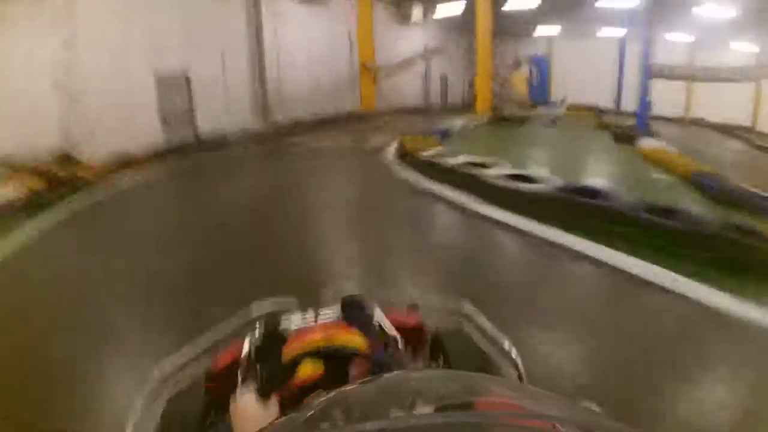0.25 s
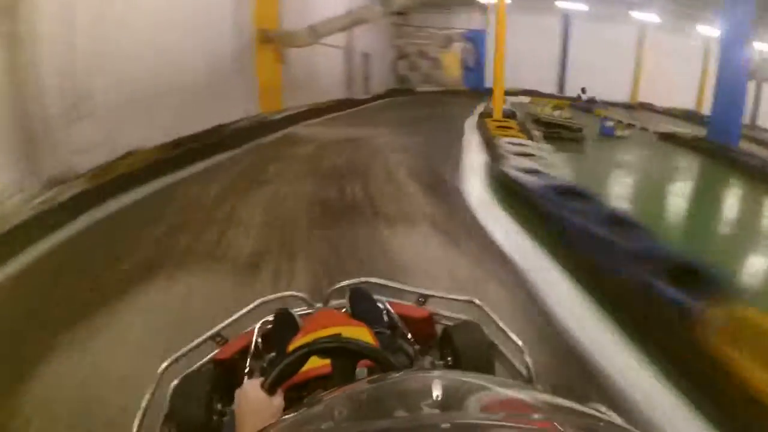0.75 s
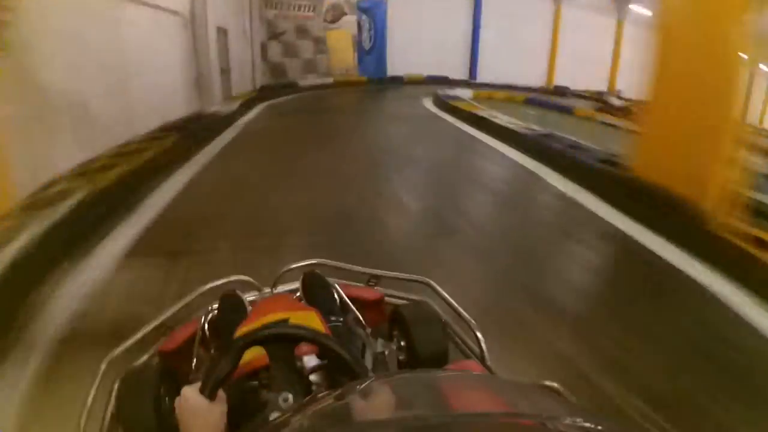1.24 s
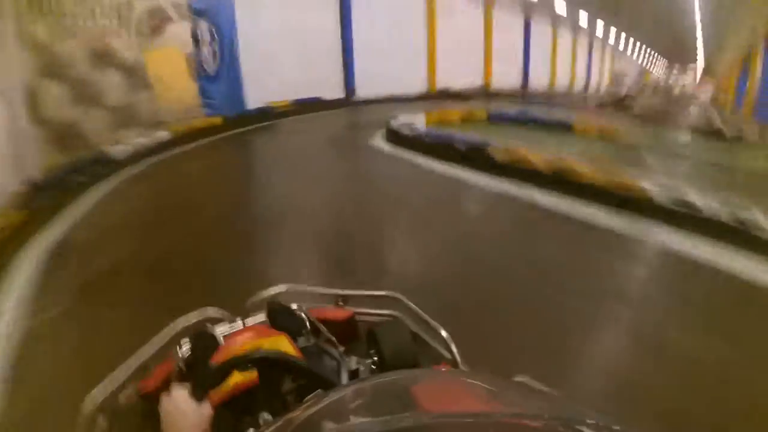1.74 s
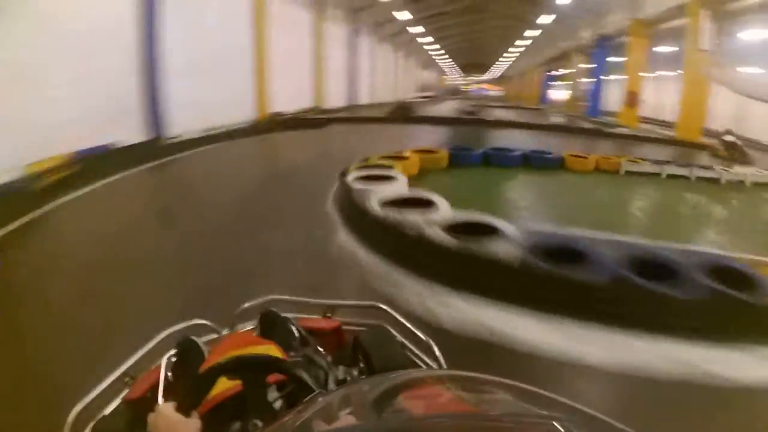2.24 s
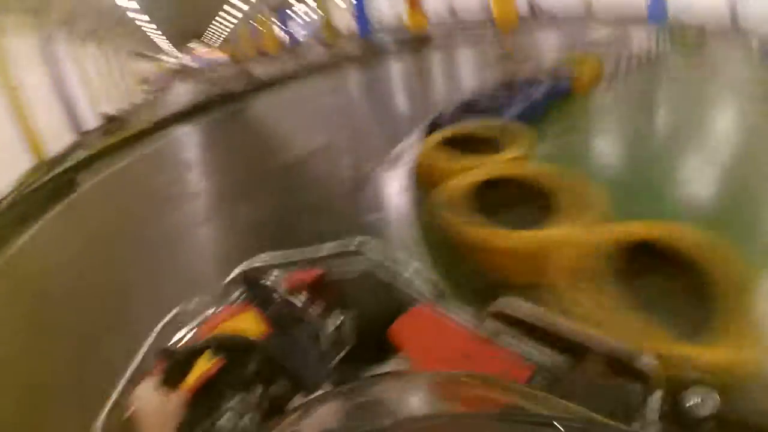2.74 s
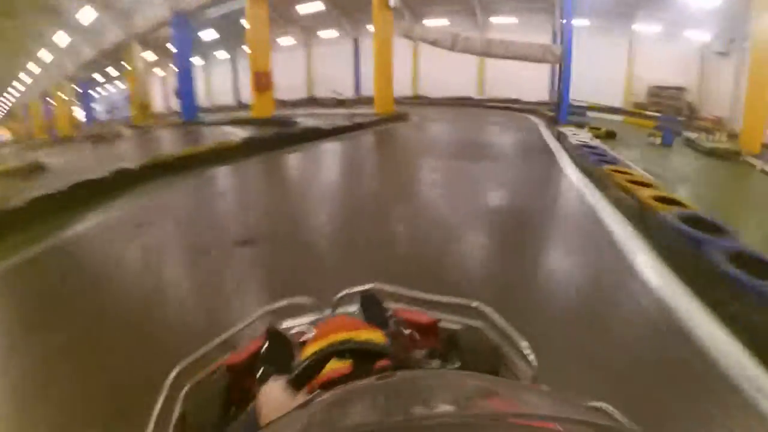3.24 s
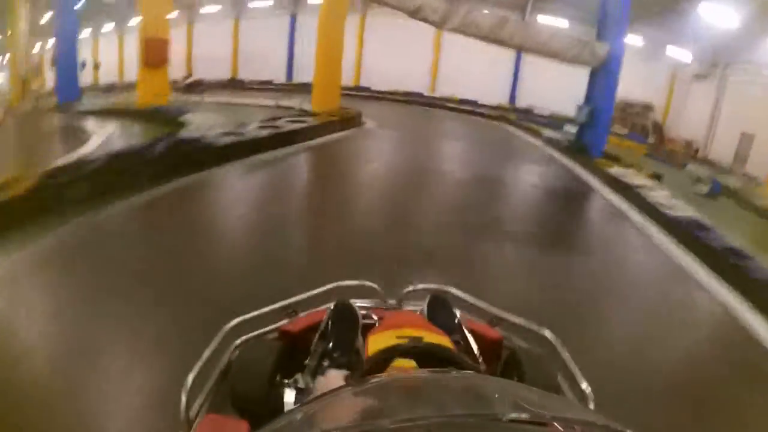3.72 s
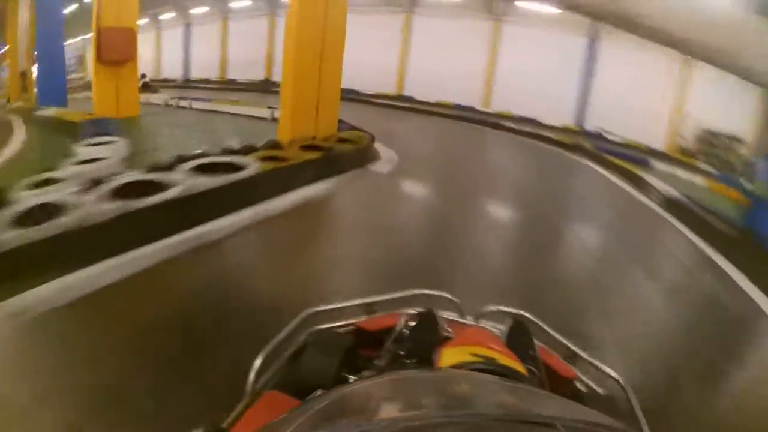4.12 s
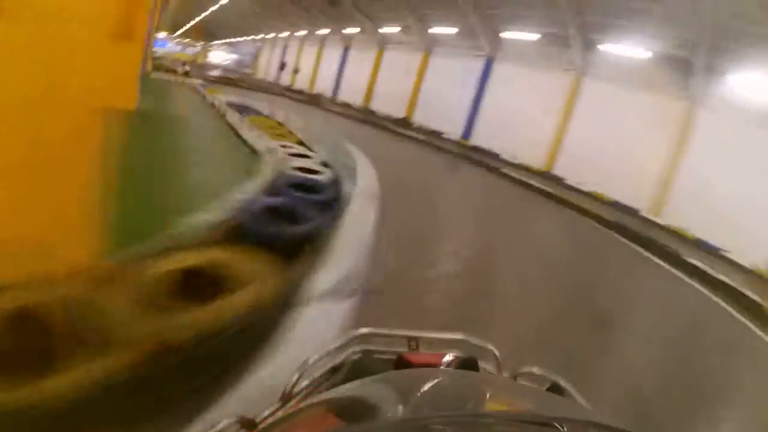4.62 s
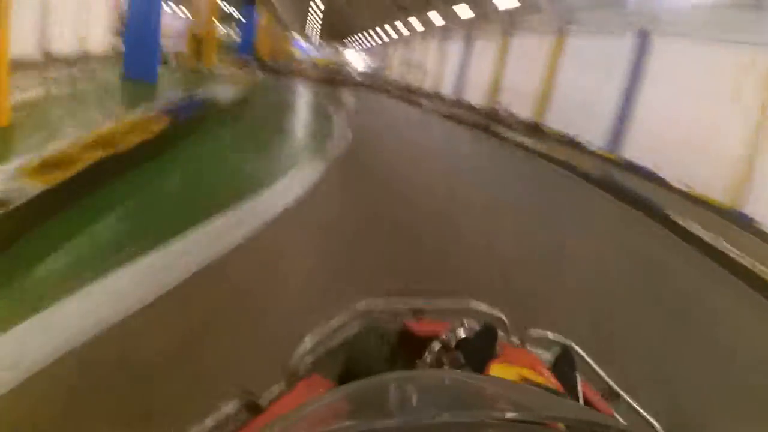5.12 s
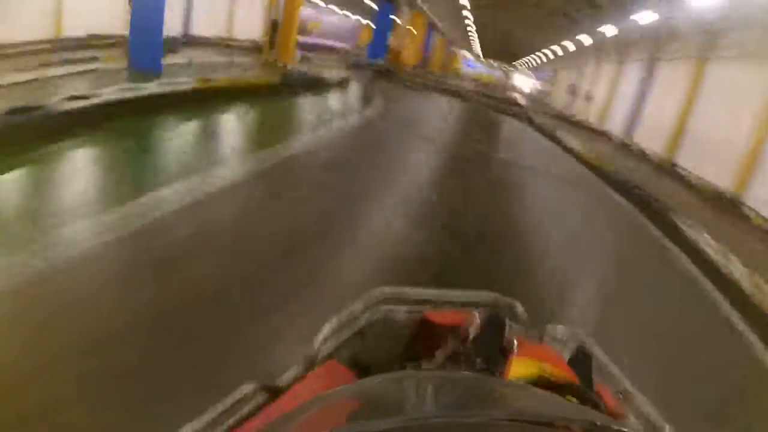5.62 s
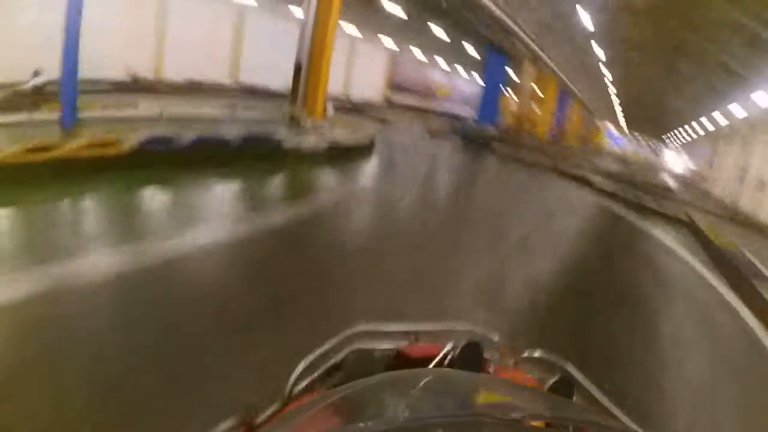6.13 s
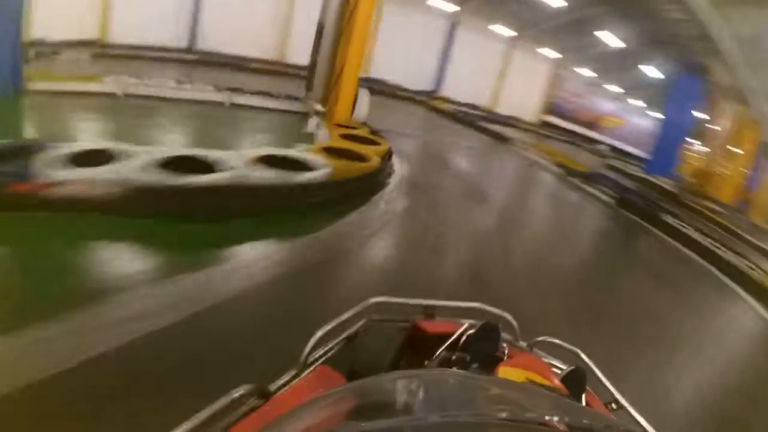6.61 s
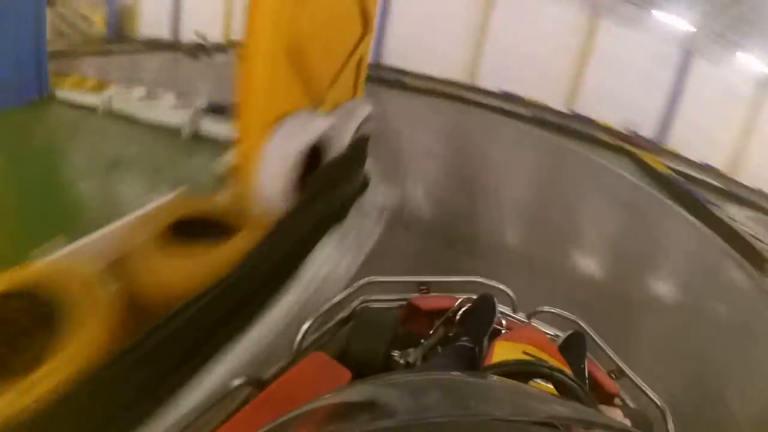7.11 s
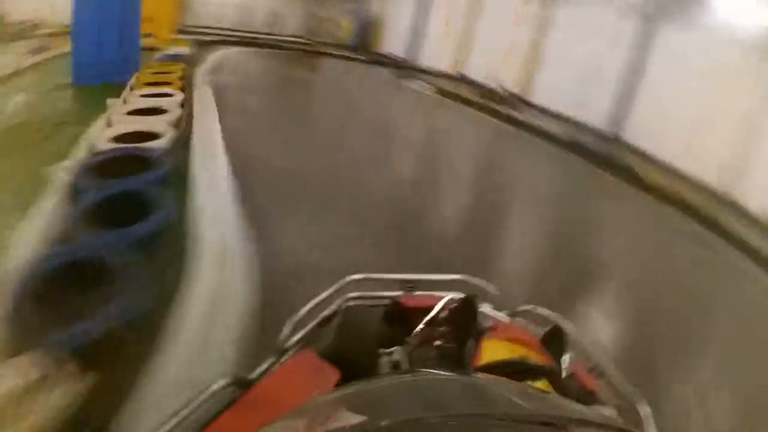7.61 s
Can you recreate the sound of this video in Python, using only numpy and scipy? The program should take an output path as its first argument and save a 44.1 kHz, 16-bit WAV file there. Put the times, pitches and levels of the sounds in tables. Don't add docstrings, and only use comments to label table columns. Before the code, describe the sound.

A close, rough, nearly mono helmet microphone rides on a small indoor kart. From 0 to 1 s the single-cylinder engine crackles quickly, about 35 pops a second, with low pipe thumps, buzzing metal and tyre hiss. At 1 s the throttle shuts: the crackle drops away, revs sink, and sharp plasticky knocks cluster until about 2.4 s. Breathy, patchy tyre squeal fills 1.4 to 2.6 s, strongest near 2.1. Around 2.8 s power returns, slower at roughly 24 pops a second, with small chirps; from 4.4 s it pulls harder and climbs slightly until 5.9. Then it cuts, coasting down in pitch over duller rattle. At 7.4 s the crackle snaps back as tyres squeal loudest near 7.55, continuing to the end at about 7.9 s. Deep floor bumps and low rumble thump throughout, occasionally clipping; bumps are gentler from 4 to 5.7 s.

```python
import sys
import numpy as np
from scipy import signal
from scipy.fft import rfft, irfft
from scipy.io import wavfile
from scipy.ndimage import uniform_filter1d

SR = 44100
rng = np.random.default_rng(int(sys.argv[2]) if len(sys.argv) > 2 else 0)


def unload_audio(sound):
    columns = np.transpose(np.atleast_2d(sound))
    steps = np.round(np.clip(columns, -1, 1) * 32767)
    wavfile.write(sys.argv[1], SR, steps.astype(np.int16))


def boost_factor(decibels):
    exponent = np.asarray(decibels, float) / 20
    return 10 ** exponent


N = 346626


def unit(x):
    return x / np.sqrt(np.mean(x ** 2))


def noise():
    return rng.standard_normal(N)


def curves(table):
    s, *columns = np.transpose(table)
    return [np.interp(np.arange(N) / SR, s, c) for c in columns]


def ring(x, hz, width_hz, count=1):
    for _ in range(count):
        x = signal.lfilter(*signal.iirpeak(hz, hz / width_hz, SR), x)
    return x


def walk(rate):
    k = int(SR / rate)
    held = np.repeat(rng.standard_normal(N // k + 1), k)
    return unit(uniform_filter1d(uniform_filter1d(held, k), k)[:N])


def strikes(times, sizes):
    x = np.zeros(N)
    np.add.at(x, np.minimum((np.asarray(times) * SR).astype(int), N - 1), sizes)
    return x


def decay(x, seconds):
    return signal.lfilter([1], [1, -np.exp(-1 / (seconds * SR))], x)


def swells(times, dbs, rise_s, fall_s):
    out, t = 0, np.arange(0, N + 64, 64) / SR
    for s, db in zip(times, dbs):
        shape = np.exp(np.minimum((t - s) / rise_s, (s - t) / fall_s))
        out = np.maximum(out, boost_factor(db) * shape)
    return np.interp(np.arange(N) / SR, t, out)


def whistle(hz, width_hz):
    turn = 2 * np.pi * np.cumsum(hz) / SR
    return unit(walk(width_hz) * np.cos(turn) + walk(width_hz) * np.sin(turn))


def hum(hz, width_hz):
    return np.sqrt(2) * np.sin(2 * np.pi * np.cumsum(hz + width_hz * walk(40)) / SR)


def rattle(modes, gate, flicker_db, grain_db):
    out, jolt_db = 0, 0.35 * walk(7)
    for hz, width_hz, db in modes:
        ticks = noise() * boost_factor(grain_db * walk(300)) * gate
        rung = unit(ring(ticks, hz, width_hz * 1.555, count=2))
        out = out + boost_factor(db + flicker_db * walk(14)) * rung
    return boost_factor(jolt_db) * unit(out)


# (time [s], firings per second [Hz])
ENGINE_SPEED = [(0, 34.7), (.35, 34.25), (.95, 35.28), (1.45, 28.34), (2.1, 23.97), (2.75, 23.4),
                (3.3, 24.03), (3.6, 23.75), (4.0, 24.56), (4.4, 24.86), (4.8, 25.61), (5.2, 26.27),
                (5.6, 27.84), (5.9, 28.34), (6.5, 25.2), (7.35, 20.01), (7.55, 21.46), (7.86, 25.3)]


def engine_speed():
    return curves(ENGINE_SPEED)[0]


# (time [s], firing crack level [dB])
ENGINE_LOAD = [(0, -42), (.93, -40.5), (1.0, -51.5), (2.65, -55.5), (2.8, -43.5), (3.2, -40), (4, -40),
               (4.4, -35.5), (5.6, -34), (5.93, -36.5), (5.99, -53), (7.38, -56), (7.42, -36), (7.86, -36)]
SHUT_DB, OPEN_DB = -52, -41


def load_db():
    return curves(ENGINE_LOAD)[0]


def throttle():
    return np.clip((load_db() - SHUT_DB) / (OPEN_DB - SHUT_DB), 0, 1)


def driven(db, db_per_hz, throttle_db, favourite_hz, favourite_db, range_hz):
    coast_share = 0.5
    speed, opening = engine_speed(), throttle()
    near = np.exp(-((speed - favourite_hz) / range_hz) ** 2)
    near = near * (coast_share + (1 - coast_share) * opening)
    return boost_factor(db + db_per_hz * (speed - 25) + throttle_db * opening + favourite_db * near)


# (time [s], engine shake in the frame [dB], tyre grip on the floor [dB])
RIDE_FEEL = [(0, -21, -23.5), (.75, -21.5, -22), (1.0, -22.5, -23.5), (1.25, -26, -25), (1.5, -24, -23),
             (2.0, -28.5, -20.5), (2.6, -28, -24), (2.9, -25, -22), (3.4, -25.5, -24), (3.9, -26.5, -28),
             (4.5, -26.5, -27.5), (5.3, -25.5, -27), (5.7, -24.5, -25.5), (6.05, -24, -27), (6.6, -29, -30),
             (7.2, -29, -26.5), (7.6, -25, -25), (7.86, -24.5, -21)]
RIDE_MEAN_DB = -25


def ride():
    return curves(RIDE_FEEL)


def rolling(db, grip_share, shake_share, throttle_db, per_load):
    shake_db, grip_db = np.array(ride()) - RIDE_MEAN_DB
    extra_db = np.maximum(load_db() - OPEN_DB, 0)
    spool_s = 0.41
    push_db = uniform_filter1d(throttle_db * throttle() + per_load * extra_db, int(spool_s * SR))
    return boost_factor(db + grip_share * grip_db + shake_share * shake_db + push_db)


# (pitch [Hz], width [Hz], level [dB], extra level per dB of heavy load [dB])
CRACK_BANDS = [(1410, 460, 2.5, -0.13), (3530, 290, -2, 0.01), (5580, 830, 4, .5), (7940, 320, 0, 0.24),
               (10410, 760, -2, 0.12), (12000, 1100, -6.5, -0.3), (2680, 1040, -2, 0.04),
               (10000, 8100, 0.5, -0.07)]
# (pitch [Hz], width [Hz], level [dB])
PIPE_MODES = [(161.5, 51, -1.5), (204.4, 37, -4.5), (341.2, 33, -3.5), (584, 40, -12)]


def firings(cycle, load):
    times = np.flatnonzero(np.diff(np.floor(cycle))) / SR
    chance = rng.standard_normal((len(times), len(CRACK_BANDS) + 2))
    times = times + 0.00032 * chance[:, 0]
    size = boost_factor(1.0 * chance[:, 1])
    crack = 0
    for k, (hz, width_hz, db, per_load) in enumerate(CRACK_BANDS):
        own = size * boost_factor(1.5 * chance[:, k + 2])
        puff = decay(strikes(times, own), 0.0012)
        puff = puff + 0.3 * decay(strikes(times + 0.0024, own), 0.0034)
        gas = decay(puff, 0.00035) * noise()
        gain = boost_factor(db) * (load / boost_factor(OPEN_DB)) ** per_load
        crack = crack + gain * unit(ring(gas, hz, width_hz, count=2))
    blow = strikes(times - 0.002, size)
    thump = sum(boost_factor(db) * unit(ring(blow, hz, width_hz, count=2)) for hz, width_hz, db in PIPE_MODES)
    thump_gain = boost_factor(-21.5) * np.minimum(load, boost_factor(OPEN_DB + 0.5)) ** 0.5
    return boost_factor(4.0) * load * unit(crack) + thump_gain * thump_unit(thump)


def thump_unit(thump):
    return unit(thump)


# (level at 25 Hz [dB], rise per Hz of speed [dB],
# gain under throttle [dB], favourite speed [Hz], gain there [dB], range [Hz])
SHAKE_TWICE = (-41.5, 0.57, 4, 27.5, 11.5, 2.6)
SHAKE_ONCE = (-45, 0.37, 9.5, 25, 6, -0.2)
CHAIN_WHIR = (-60, 1.8, 7.5, 27, 11, 1.5)


def shafts(cycle, load):
    turn = 2 * np.pi * cycle + 0.08 * walk(6)
    twice = driven(*SHAKE_TWICE) * np.cos(2 * turn - 0.4)
    once = driven(*SHAKE_ONCE) * np.cos(turn)
    overtones = boost_factor(-26.0) * np.cos(3 * turn - 1.7) + boost_factor(-37.5) * np.cos(4 * turn - 1.9)
    chain = driven(*CHAIN_WHIR) * whistle(27.6 * engine_speed(), 170)
    return boost_factor(3.0) * (twice + once) + load ** 0.5 * overtones + chain


# (time [s], nod level [dB])
NOD_BUMPS = [(0, -7.5), (.22, -9.5), (.61, -13), (1.07, -9.5), (1.4, -14), (1.66, -6.5), (1.88, -11),
             (2.15, -13.5), (2.6, -13.5), (2.85, -10), (3.08, -10), (3.48, -16), (3.81, -15.5), (4.15, -27),
             (4.77, -23.5), (5.08, -20), (5.27, -22), (5.48, -17), (5.65, -17), (5.87, -9), (6.06, -7),
             (6.55, -18.5), (6.78, -19), (7.03, -11.5), (7.33, -23), (7.52, -8.5)]
# (time [s], thud level [dB])
FLOOR_JOINTS = [(.02, -20), (.6, -36.5), (1.12, -14), (1.63, -10), (2.85, -21), (3.05, -16), (3.8, -18),
                (4.72, -19.5), (5.83, -18), (6.061, -18), (6.36, -24), (7.02, -41), (7.5, -30)]
# (pitch [Hz], level per Hz [dB])
DRONE_COLOUR = [(14, -34), (24, -4.5), (36, -10), (60, -13.5), (144, -26), (212, -25), (321, -26.5),
                (383, -32.5), (464, -34), (638, -29.5), (983, -29), (1100, -27), (1430, -53), (2420, -120)]
# (level at 25 Hz [dB], rise per Hz [dB],
# gain under throttle [dB], favourite speed [Hz], gain there [dB], range [Hz])
SHELL_HUM = (-46, 0.64, 1, 23.4, 10, 0.6)


def helmet():
    nod = boost_factor(-27) + swells(*np.transpose(NOD_BUMPS), rise_s=0.078, fall_s=0.11)
    bob = np.sqrt(2) * np.sin(2 * np.pi * np.cumsum(8.5 + 2.0 * walk(5)) / SR)
    judder = boost_factor(-34) * unit(ring(noise(), 70, 70, count=2))
    s, db = np.transpose(FLOOR_JOINTS)
    thud = ring(ring(strikes(s, boost_factor(db)), 26, 28, count=2), 31, 38) * 1100
    hz = np.maximum(np.arange(N // 2 + 1) * SR / N, 1)
    colour_hz, colour_db = np.transpose(DRONE_COLOUR)
    colour = np.interp(np.log(hz), np.log(colour_hz), colour_db)
    drone = unit(irfft(rfft(noise()) * boost_factor(colour), N))
    drone_db = -36.5 + 0.8 * (ride()[0] - RIDE_MEAN_DB)
    shell = driven(*SHELL_HUM) * hum(98 + 2.574 * walk(2), 3.44)
    return nod * (bob + judder) + thud + boost_factor(drone_db + 6.5) * drone + shell


# (pitch [Hz], width [Hz], level [dB])
FRAME_MODES = [(1224, 227, -2), (1455, 220, 1.5), (1747, 182, -4.5), (2192, 284, -7)]


def frame_rattle(after):
    return boost_factor(ride()[0]) * rattle(FRAME_MODES, 1 + 0.89 * after, flicker_db=0.5, grain_db=1.8)


# (pitch [Hz], width [Hz], level [dB])
CASE_MODES = [(3450, 217, -0.5), (3922, 560, -2.5), (2860, 640, -10)]


def case_rattle(after):
    gain = boost_factor(ride()[1] + 0.63)
    return gain * rattle(CASE_MODES, 1 + 1.2 * after, flicker_db=0.56, grain_db=1.7)


# (pitch [Hz], width [Hz], level [dB])
TYRE_MODES = [(5246, 710, -0.5), (6290, 1250, 0), (7530, 980, -7)]
# (level [dB], share of grip [0-1], share of shake [0-1],
# gain under throttle [dB], gain per dB of extra load [dB])
TYRE_FEED = (-36.5, 0.79, .3, 0, 0.32)


def tyre_hiss(after):
    gain = rolling(*TYRE_FEED) * boost_factor(5.5)
    return gain * rattle(TYRE_MODES, 1 + 1.14 * after, flicker_db=0.9, grain_db=1.6)


# (pitch [Hz], width [Hz], level [dB])
TOP_MODES = [(8100, 230, -3), (10500, 2600, 0), (12100, 6900, -3.5)]
# (level [dB], share of grip [0-1], share of shake [0-1],
# gain under throttle [dB], gain per dB of extra load [dB])
TOP_FEED = (-43.5, 0.7, 0.34, 2.5, 0.24)


def top_hiss(after):
    sliding = boost_factor(-21) * swells(*np.transpose(SLIDES)[:2], SLIDE_RISE_S, SLIDE_FALL_S)
    gain = rolling(*TOP_FEED) * boost_factor(-1.7) + sliding
    return gain * rattle(TOP_MODES, 1 + 1.1 * after, flicker_db=1.7, grain_db=1.5)


# (level at 25 Hz [dB], rise per Hz of speed [dB],
# gain under throttle [dB], favourite speed [Hz], gain there [dB], range [Hz])
PANEL_DRIVE = [(-57, .9, 8.8, 24.3, 6.5, 0.78), (-54, 1.24, 2.9, 27.8, 2, .8),
               (-48.5, 1.2, 1.7, 28, 4.3, 1.6), (-41, 0.38, 9.6, 24.5, 6.7, .4)]
# (pitch [Hz], width [Hz])
PANEL_PITCHES = [(343, 12), (583, 24), (920, 55), (1170, 90)]


def panels():
    out = 0
    for law, (hz, width_hz) in zip(PANEL_DRIVE, PANEL_PITCHES):
        gain = driven(*law) * boost_factor(0.75 * walk(6.6) - 5.0)
        rough = unit(ring(noise(), hz, width_hz, count=2))
        out = out + gain * (hum(hz, width_hz * 0.5) + 0.78 * rough)
    return out


# (time [s], peak level [dB], pitch [Hz], length [s])
LOOSE_KNOCKS = [(0.977, -2, 3560, 0.012), (1.118, -21, 1370, 0.018), (1.344, -4, 3730, 0.032),
                (1.389, -13, 1310, 0.02), (1.486, -4, 3780, 0.018), (1.498, -4.5, 1490, 0.016),
                (1.6245, 0.5, 3600, 0.022), (1.716, -0.5, 3660, 0.025), (1.76, -3.5, 3510, 0.022),
                (1.871, -2.5, 3580, 0.022), (2.041, -6, 3540, 0.031), (2.4024, -3, 3600, 0.02),
                (2.782, -6, 1470, 0.015), (2.815, -3.5, 3370, 0.02), (3.359, -5.5, 3450, 0.014),
                (4.427, -5.5, 3340, 0.011), (4.704, -6, 3450, 0.011), (6.061, -10, 1490, 0.025),
                (6.3596, -13, 3700, 0.022), (7.309, -10.5, 1440, 0.025), (7.623, -15, 1530, 0.014)]
# (time [s], peak level [dB], pitch [Hz], length [s])
TYRE_CHIRPS = [(1.37, -26, 8600, .01), (2.09, -19, 7300, .02), (2.86, -20, 8100, .02),
               (2.985, -19, 4870, .01), (2.99, -19, 6870, 0.034), (3.277, -18, 6900, 0.01),
               (3.398, -25, 8100, .012), (6.67, -32, 8000, .008), (6.746, -20, 5300, .01),
               (7.449, -28, 10500, .003), (7.547, -17, 11600, .003), (7.648, -18, 10500, .003)]


def knocks():
    out = np.zeros(N)
    softer_knocks = [(s, db - 8.0, hz, length) for s, db, hz, length in LOOSE_KNOCKS]
    for s, db, hz, length in softer_knocks + list(TYRE_CHIRPS):
        burst = rng.standard_normal(4096) * np.exp(-np.arange(4096) / (length * SR))
        burst = ring(burst, hz, hz * 0.14, count=2)
        start = int(s * SR)
        out[start:start + 4096] += boost_factor(db) * burst / np.abs(burst).max()
    return out


# (time [s], squeal level [dB], lower squeal level [dB])
SLIDES = [
    (1.45, -33, -36),
    (1.75, -25, -46),
    (1.97, -27.5, -29),
    (2.08, -24.5, -34),
    (2.4, -28.5, -43),
    (2.62, -38, -41),
    (7.2, -33, -38),
    (7.4, -24.5, -40),
    (7.56, -22.5, -40),
    (7.83, -26, -34),
]
SLIDE_RISE_S, SLIDE_FALL_S = 0.21, 0.33


def squeal():
    s, high_db, low_db = np.transpose(SLIDES)
    high = whistle(6300 + 80 * walk(9), 1200)
    low = whistle(5430 + 70 * walk(12), 450)
    high_gain = swells(s, high_db - 3.0, SLIDE_RISE_S, SLIDE_FALL_S) * boost_factor(1.5 * walk(20))
    low_gain = swells(s, low_db, SLIDE_RISE_S * 0.45, SLIDE_FALL_S * 0.6)
    return high_gain * high + low_gain * low


def scene():
    cycle = np.cumsum(engine_speed()) / SR + 0.345
    load = boost_factor(load_db())
    after = np.minimum(load * 40, 1) * np.exp(-(cycle % 1) / 0.2)
    mono = firings(cycle, load) + shafts(cycle, load) + helmet()
    mono = mono + frame_rattle(after) + case_rattle(after) + tyre_hiss(after) + top_hiss(after)
    mono = mono + panels() + knocks() + squeal()
    side = boost_factor(-58) * unit(ring(noise(), 35, 60, count=2))
    side = side + boost_factor(-85) * unit(ring(noise(), 300, 400))
    return np.array([mono + side, mono - side])


def top_cut(x):
    return signal.sosfilt(signal.butter(12, 15710, fs=SR, output="sos"), x)


def record(dry):
    clipped = np.clip(dry, -0.97, 0.97)
    cut = signal.ellip(10, 0.2, 36, 15250, fs=SR, output="sos")
    mix = signal.sosfilt(cut, clipped)
    return top_cut(mix)


dry = scene()
out = record(dry)
unload_audio(out)
```